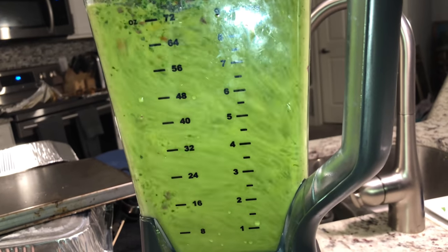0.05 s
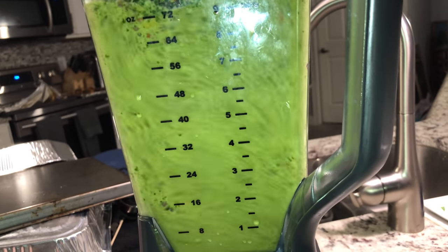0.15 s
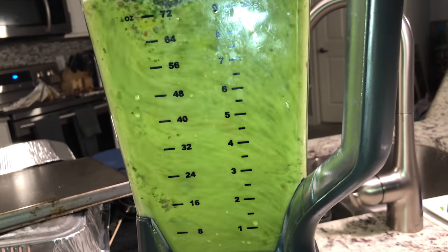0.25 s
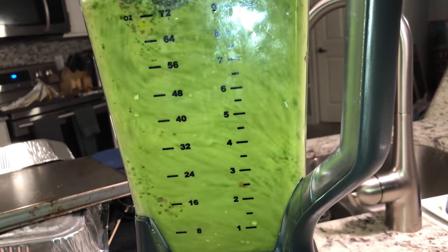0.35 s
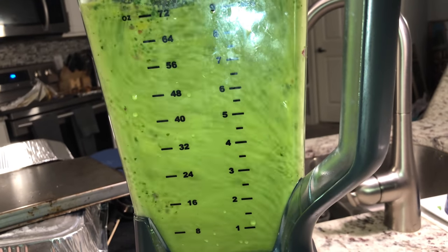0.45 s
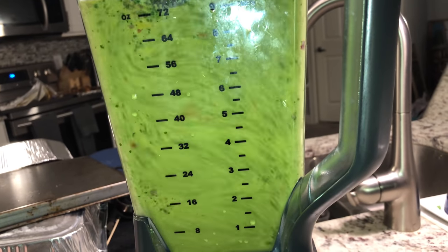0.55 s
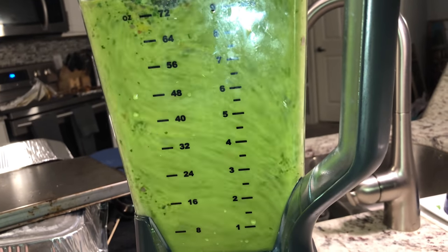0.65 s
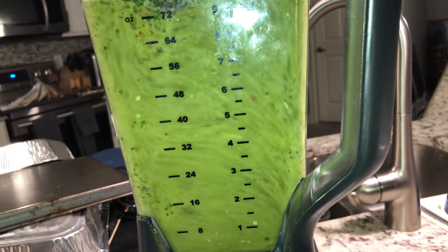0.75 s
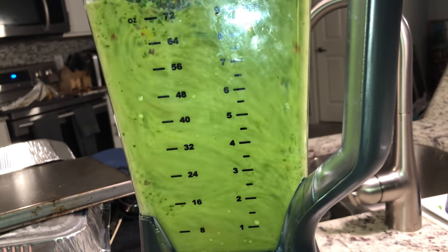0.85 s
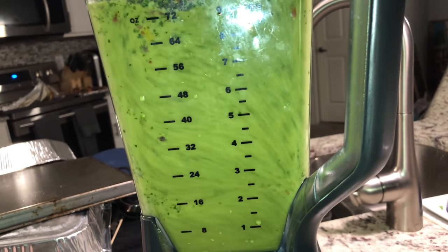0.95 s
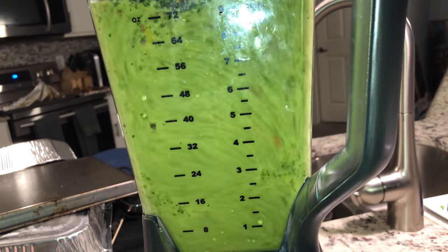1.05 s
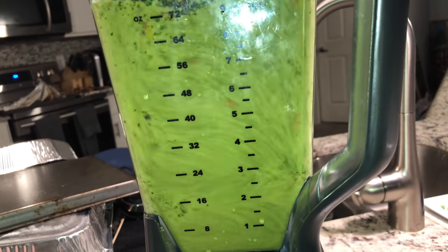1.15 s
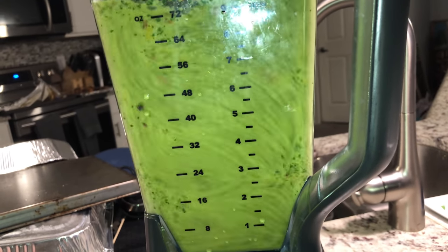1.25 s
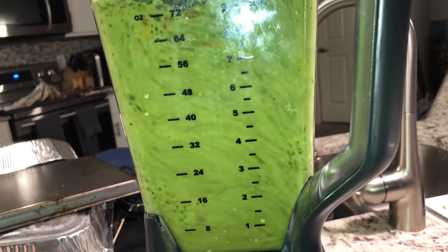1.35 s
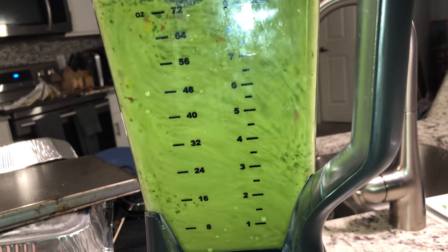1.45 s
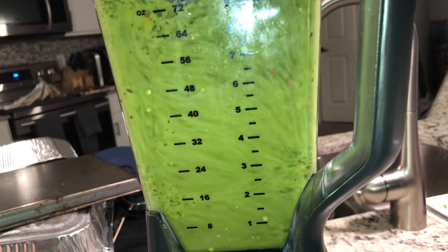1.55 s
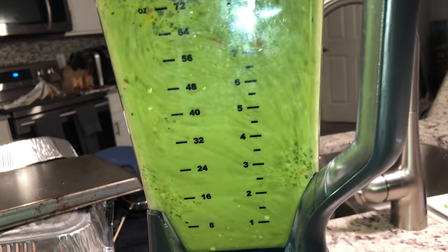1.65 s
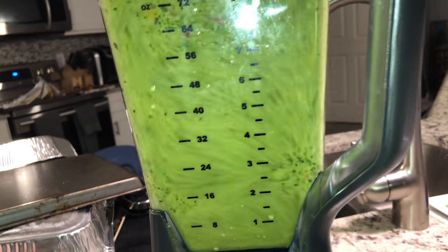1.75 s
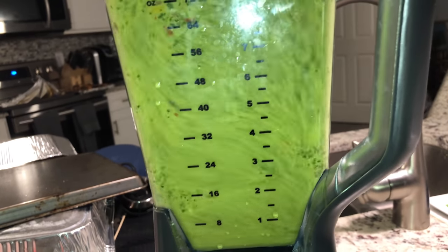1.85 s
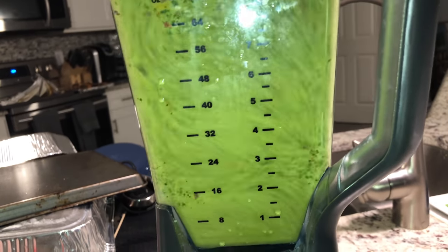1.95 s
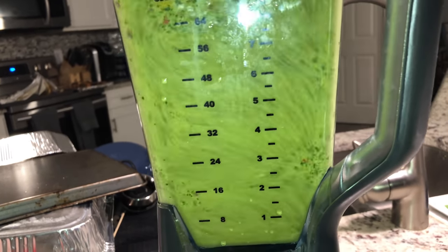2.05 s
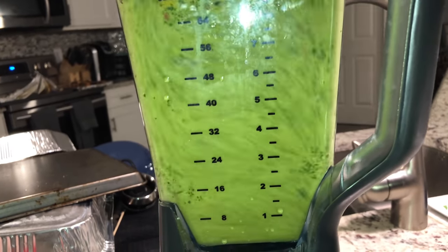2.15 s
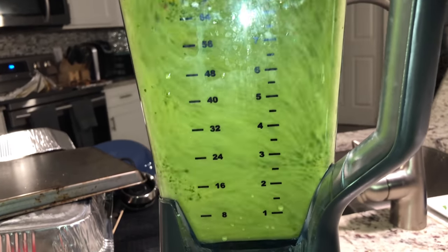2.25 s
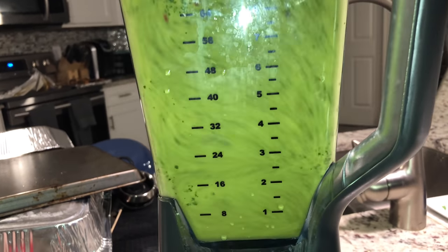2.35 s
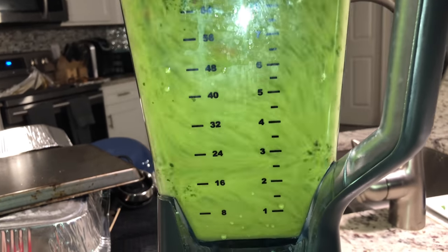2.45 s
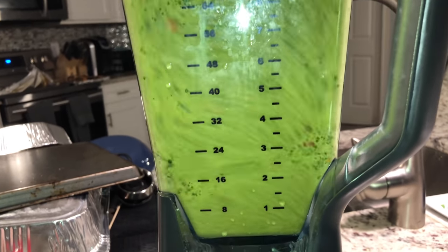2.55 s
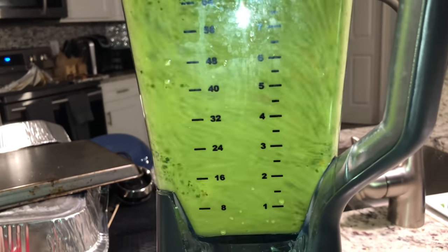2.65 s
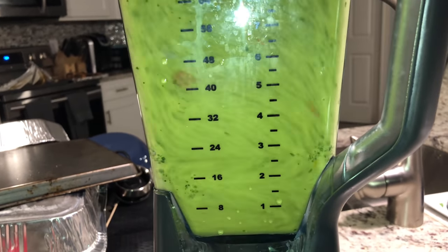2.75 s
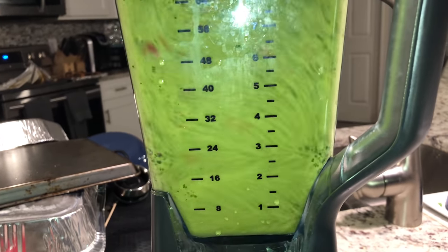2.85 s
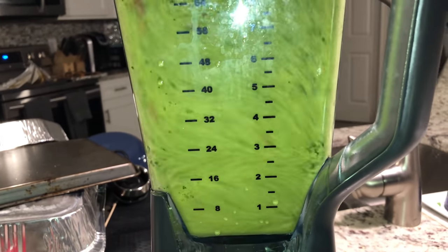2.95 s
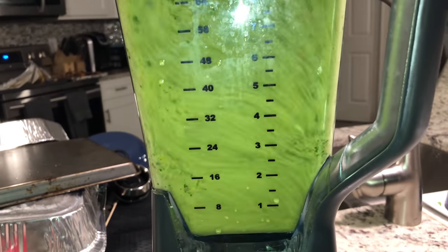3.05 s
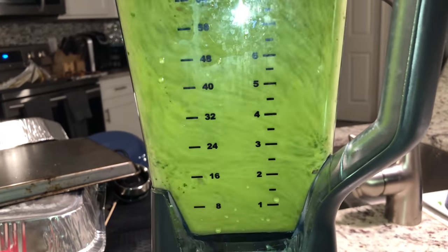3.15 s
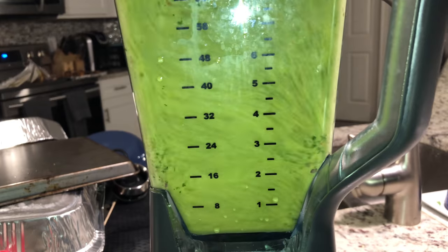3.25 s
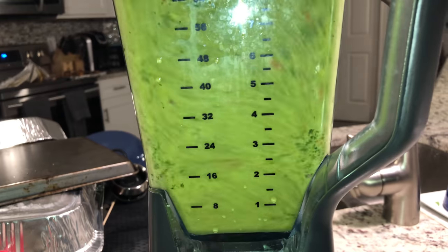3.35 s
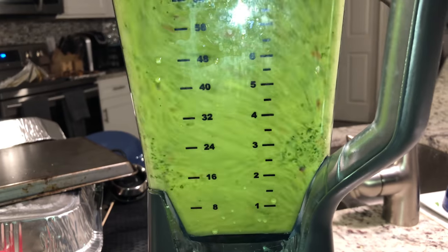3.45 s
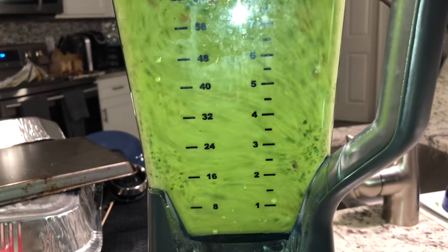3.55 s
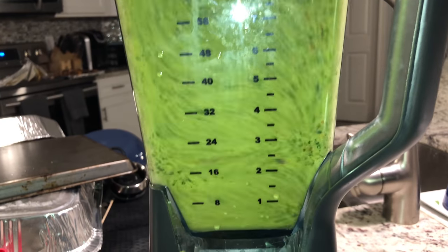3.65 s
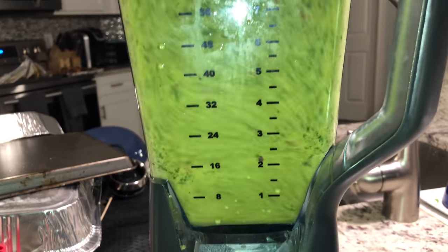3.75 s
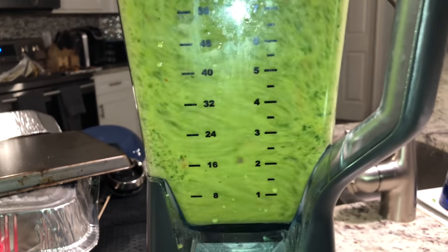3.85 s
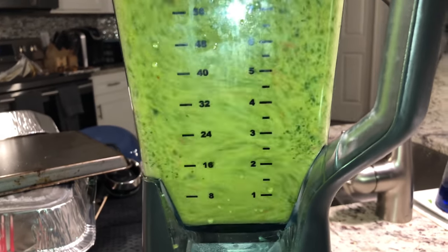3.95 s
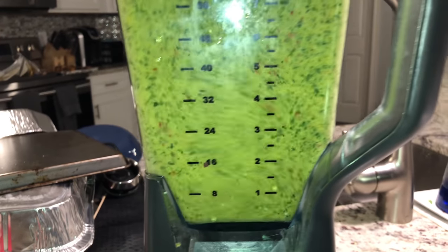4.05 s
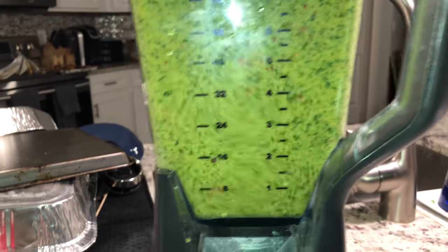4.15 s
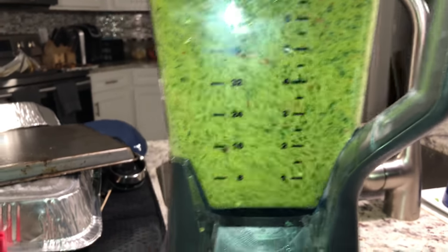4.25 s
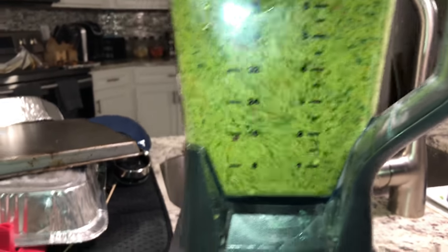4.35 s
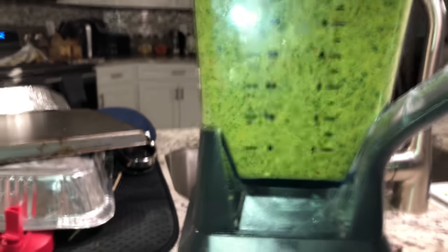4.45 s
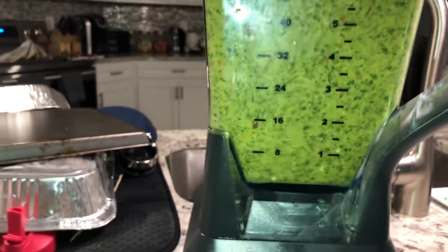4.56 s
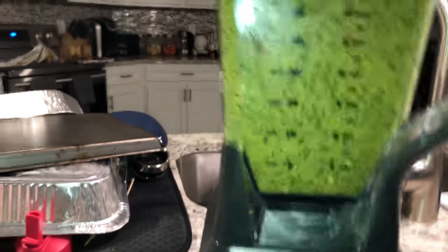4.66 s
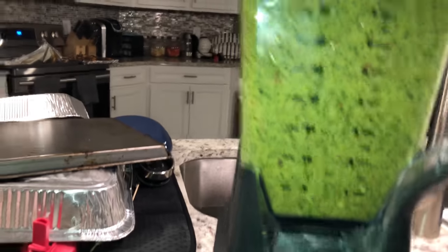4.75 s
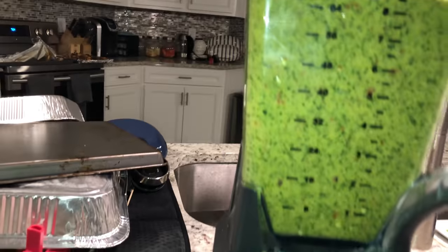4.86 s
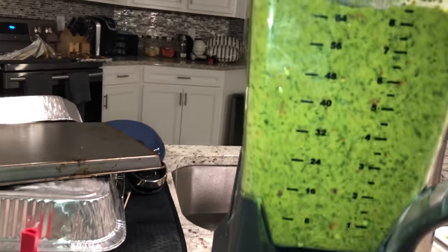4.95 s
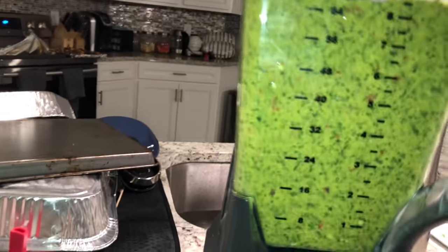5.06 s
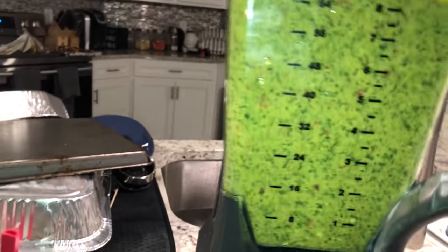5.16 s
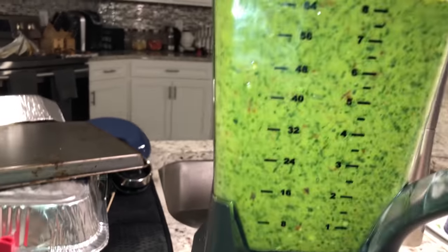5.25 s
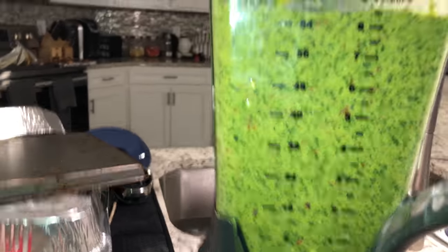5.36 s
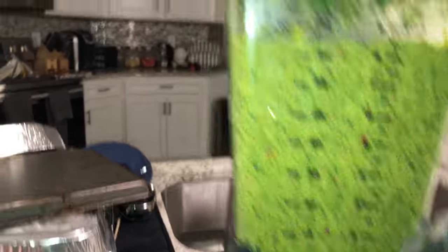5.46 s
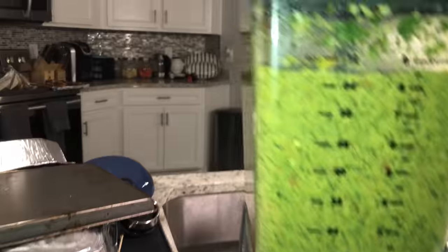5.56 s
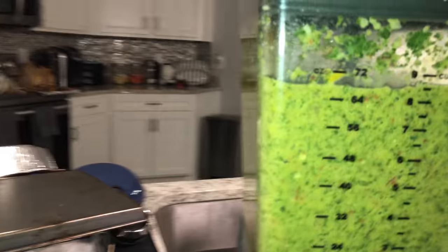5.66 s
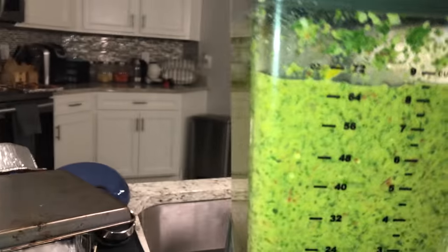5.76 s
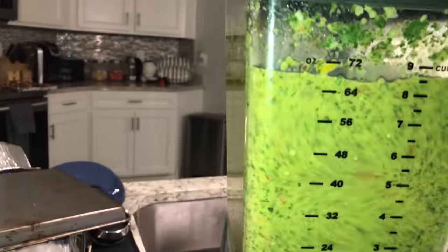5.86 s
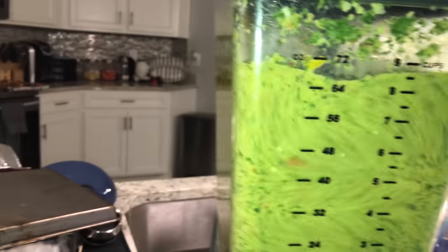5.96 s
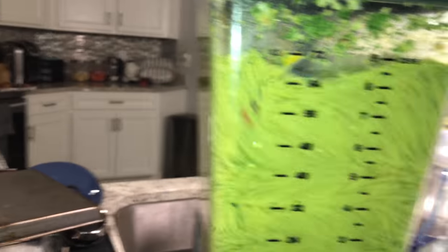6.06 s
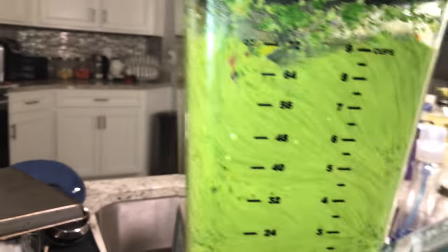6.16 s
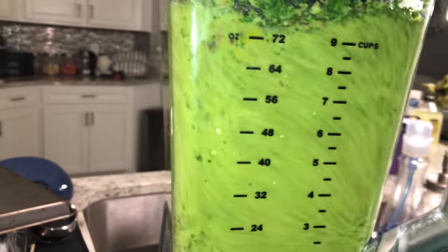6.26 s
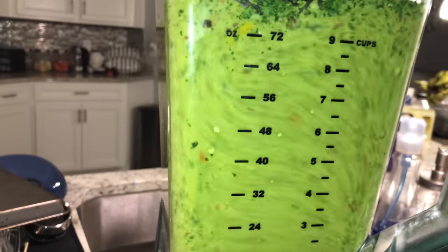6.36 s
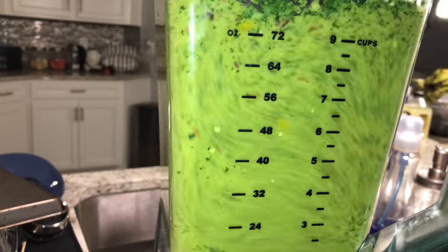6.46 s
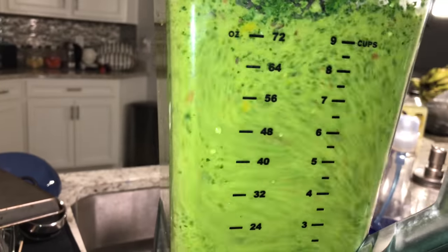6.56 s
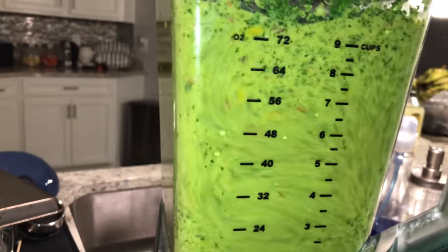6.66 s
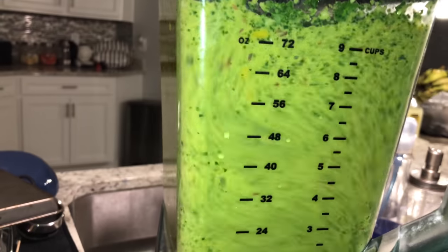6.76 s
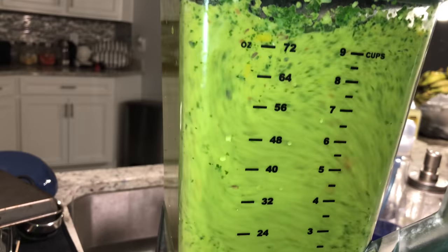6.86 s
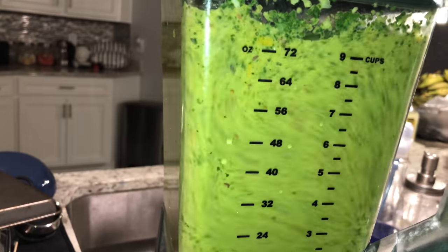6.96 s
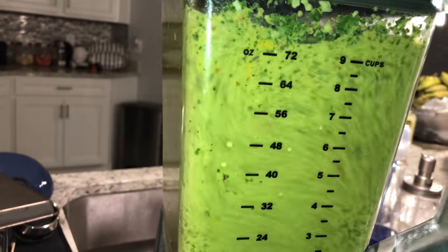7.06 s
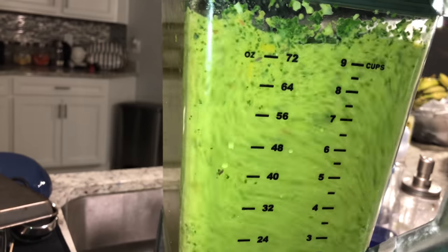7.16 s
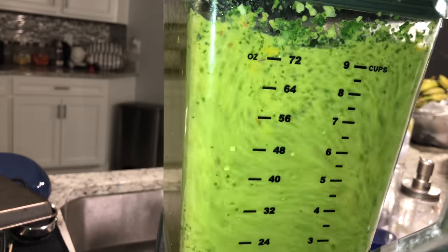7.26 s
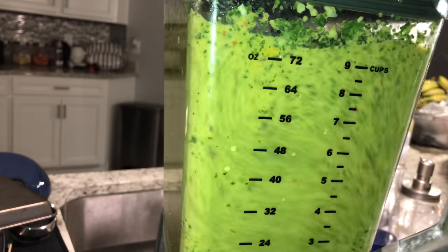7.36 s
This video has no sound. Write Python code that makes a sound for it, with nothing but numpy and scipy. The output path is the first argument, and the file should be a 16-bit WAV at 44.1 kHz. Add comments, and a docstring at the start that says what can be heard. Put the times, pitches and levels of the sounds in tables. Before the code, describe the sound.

Loud close blender churning herb paste, winding down with falling whine and slowing clacks, a brief near-silence, button clicks, then a sudden restart.

```python
"""A countertop blender purees a thick herb paste, close to a mono microphone in a kitchen.
One speed curve drives it all: brush motor flat out, switched off, coasting to rest, clicked on, spinning up.
Impact noise makes churning paste, rattling gears and crackle; fan noise is replayed at a rate set by speed.
Shaft-locked partials make hum, rumble and whines; knocks and clicks ring a panel.
Housing resonances and a short room tail shape the machine; faint kitchen noise lies beneath.
"""
import sys
import numpy as np
from scipy import signal
from scipy.fft import rfft, irfft, next_fast_len
from scipy.io import wavfile
from scipy.ndimage import map_coordinates

SR = 44100
rng = np.random.default_rng(int(sys.argv[2]) if len(sys.argv) > 2 else 0)


def pcm_store(signal):
    """Save signal as 16-bit PCM."""
    levels = np.round(np.clip(np.atleast_2d(signal), -1, 1) * 32767)
    wavfile.write(sys.argv[1], SR, levels.astype(np.int16).T)


N = 326781

REF_SPEED_RPS = 265  # pace = 1; rps = motor turns/s
GEAR_RATIO = 5  # motor turns per blade turn
SWITCH_OFF_S, STOP_S, RESTART_S = 3.32, 5.4285, 5.689
MAINS_HZ, TOP_HZ = 60, 15800


def amp(db):
    """Decibels to gain."""
    return 10 ** (np.asarray(db) / 20)


def unit(x):
    """Scale to rms 1."""
    return x / np.sqrt(np.mean(x ** 2) + 1e-20)


def along(points, hz):
    """Interpolate (f/Hz, value) points on a log axis."""
    f, v = np.transpose(points)
    return np.interp(np.log(hz + 1), np.log(f + 1), v)


def curves(rows):
    """One value per sample for each column after the time."""
    s, *cols = np.transpose(rows)
    return np.array([np.interp(np.arange(N) / SR, s, c) for c in cols])


def since(s):
    """Seconds gone by after time s, 0 before it."""
    return np.maximum(np.arange(N) / SR - s, 0)


def swell(s, half_s):
    """Gaussian bell of height 1 at time s, down to 1/e at half_s either side."""
    return np.exp(-((np.arange(N) / SR - s) / half_s) ** 2)


def wobble(rate):
    """Smooth random curve, rate knots a second."""
    knots = rng.standard_normal(int(N * rate / SR) + 4)
    return map_coordinates(knots, [np.arange(N) * rate / SR])


def shaped(x, gain_db):
    """Causal minimum-phase filter with the given dB function of frequency."""
    size = 2 * next_fast_len(N // 2 + SR // 4)
    cepstrum = irfft(np.log(amp(gain_db(np.fft.rfftfreq(size, 1 / SR)))))
    # fold the anticausal half onto the causal one
    cepstrum[1:size // 2] *= 2
    cepstrum[size // 2 + 1:] = 0
    return irfft(rfft(x, size) * np.exp(rfft(cepstrum)))[:N]


def coloured(x, spectrum):
    """x filtered by the given spectrum, at rms 1."""
    return unit(shaped(x, lambda hz: along(spectrum, hz)))


def resonate(x, modes):
    """Resonances lift bands, hollows cut them: dB bells summed over (f/Hz, width/Hz, level/dB)."""
    def gain_db(hz):
        return sum(db / (1 + (2 * (hz - f) / width) ** 2) for f, width, db in modes)
    return shaped(x, gain_db)


def impacts(rate, share):
    """Random impacts, rate a second, carrying a share of the power over a smooth rush."""
    chance = np.clip(rate / SR, 1 / SR, 1)
    share = np.clip(share, 0, 1)
    hits = (rng.random(N) < chance) * rng.standard_normal(N) / np.sqrt(chance)
    return np.sqrt(share) * hits + np.sqrt(1 - share) * rng.standard_normal(N)


def tone(turns, order, blur, waver_db=1.8):
    """One partial of a turning shaft, rms 1, unsteady in level and phase (blur/rad)."""
    waver = amp(waver_db * wobble(14))
    return unit(waver * np.sin(2 * np.pi * order * turns + blur * wobble(45)))


def room(x, wet_db, t60_s):
    """Add a short, dense decaying tail: the answer of a casing or of counter and cabinets."""
    t = np.arange(SR // 2) / SR
    tail = rng.standard_normal(len(t)) * amp(-60 * t / t60_s) * (t > .002)
    return x + amp(wet_db) * signal.fftconvolve(x, tail / np.linalg.norm(tail))[:N]


def second_run():
    """0 until the restart, then a 4.5 ms rise to 1."""
    return np.clip((np.arange(N) / SR - RESTART_S) / 0.0045, 0, 1)


START_RPS, SAG_RPS_PER_S = 267.2, 1.0
RAMP_RPS_PER_S, RAMP_S = 126, .6
# dry friction; speed at which drag equals it
FRICTION_RPS_PER_S, DRAG_RPS = 84.87, 161.3
# spin-up target; share of it won in the kick; time constants
TARGET_RPS, KICK_SHARE, KICK_S, CLIMB_S = 273.2, .556, .063, .32


def motor_speed():
    """Turns/s: slight sag, ramp down, coast against friction and square-law drag; then kick and slow climb."""
    t = np.arange(N) / SR
    powered = START_RPS - SAG_RPS_PER_S * t - RAMP_RPS_PER_S * np.minimum(since(SWITCH_OFF_S), RAMP_S)
    to_stop = np.clip(STOP_S - t, 0, STOP_S - SWITCH_OFF_S)
    coasting = DRAG_RPS * np.tan(FRICTION_RPS_PER_S / DRAG_RPS * to_stop)
    running = since(RESTART_S)
    lag = KICK_SHARE * np.exp(-running / KICK_S) + (1 - KICK_SHARE) * np.exp(-running / CLIMB_S)
    return np.minimum(powered, coasting) + TARGET_RPS * np.maximum(1 - lag, 0)


# wads of herbs drag through the blades: (t/s, half-width/s, level/dB before a layer's share)
WADS = [(1.95, 0.082, 2), (2.75, 0.7, 1.5), (3.25, 0.098, 0.5), (3.7, 0.093, 1), (4.23, .09, 1.5),
        (6.13, .11, 4), (6.4, 0.11, 1)]
# level dips briefly after switch-off: (t/s, half-width/s, level/dB before a layer's share)
SWITCH_OFF_DIP = [(3.43, 0.15, -2.5)]
# the paste settles as the blades stop
SETTLE_S, SETTLE_DB_PER_S = 5.255, 68


def drive(pace, full_db, lid_db, growth, strain_db, creep_db, wad_share, dip_share):
    """Layer gain: power of the speed, shuddering strain of spin-up, steady creep that settles at the stop."""
    on, running = second_run(), since(RESTART_S)
    spin = amp(full_db + lid_db * on) * pace ** growth
    strain = amp(strain_db) * on * np.clip(1 - pace, 0, 1)
    creep = amp(creep_db - SETTLE_DB_PER_S * since(SETTLE_S))
    # inrush torque pulses at twice mains
    shudder = 1 + 0.5 * np.exp(-running / 0.068) * np.sin(2 * np.pi * 2 * MAINS_HZ * running)
    wads_db = sum(db * swell(s, half_s) for s, half_s, db in WADS)
    dip_db = sum(db * swell(s, half_s) for s, half_s, db in SWITCH_OFF_DIP)
    power = spin ** 2 + strain ** 2 + creep ** 2
    return np.sqrt(power) * shudder * amp(wad_share * wads_db + dip_share * dip_db)


# churn spectrum: (f/Hz, relative level/dB per Hz)
PASTE_SPECTRUM = [(25, -66), (45, -23), (80, -19.5), (110, -15.5), (150, -4.5), (210, 0.5), (280, -2.5),
                  (400, -4), (550, -7.5), (900, -19.5), (2500, -51.5)]


def paste(pace):
    """Blades slap the paste and air pockets collapse in it: dull, irregular thuds."""
    thuds = impacts(250 + 300 * pace, share=0.28) * amp(0.62 * wobble(22))
    return amp(-1.8) * coloured(thuds, PASTE_SPECTRUM)


def unbalance(speed, turns, mount_hz=150, width_hz=45):
    """The motor's first two orders boom as they cross the resonance of the base on its feet."""
    boom = sum(tone(turns, order=k, blur=0.56) / np.hypot(1, 2 * (k * speed - mount_hz) / width_hz)
               for k in (1, 2))
    return amp(-8) * boom * np.clip(speed / 60, 0, 1) ** 2


# blade-shaft unbalance: (multiple of blade speed, relative level/dB)
BLADE_ORDERS = [(1, -50.5), (2, -50), (3, -39.5), (4, -36), (5, -40.5), (8, -44), (9, -46.5)]


def hum(pace, blade_turns):
    """The loaded blade shaft shakes the base at its lowest orders, heard less from above."""
    orders = sum(amp(db) * tone(blade_turns, order=round(k), blur=0.2) for k, db in BLADE_ORDERS)
    return amp(27.0) * orders * pace ** 4 * amp(-4 * second_run())


# rattle spectrum: (f/Hz, relative level/dB per Hz)
GEAR_SPECTRUM = [(40, -52), (150, -30.5), (400, -4.5), (650, -0.5), (1100, -1), (1700, -2.5), (2400, -9.5),
                 (3300, -12.5), (6000, -23.5), (15000, -63)]


def gears(pace, blade_turns, load):
    """Teeth and coupling rattle, denser with speed and harder as each blade bites."""
    bite = 1 + 0.15 * np.sin(2 * np.pi * 2 * blade_turns)
    rattle = impacts(500 + 1000 * pace, share=0.32) * bite * load
    return amp(-.5 + 2.4 * pace) * coloured(rattle, GEAR_SPECTRUM)


# air-noise spectrum at pace 1: (f/Hz, relative level/dB per Hz)
FAN_SPECTRUM = [(40, -63), (600, -24), (1500, -17), (2100, -2.5), (2600, 0), (2950, -0.5), (3300, -2),
                (4200, -15.5), (9000, -43)]


def fan(pace, load):
    """Air torn by the cooling fan: noise replayed at the pace, so pitch and strength go with speed."""
    air = coloured(impacts(1100, share=0.27), FAN_SPECTRUM)
    return amp(1.0) * pace * load * map_coordinates(air, [np.cumsum(pace)], mode="wrap")


# motor-frame resonances and hollows: (f/Hz, width/Hz, level/dB); also shapes hiss
FRAME_MODES = [(344, 75, 4.5), (476, 71, -10.5), (860, 80, -7), (1625, 110, 0), (1980, 71, -4),
               (3020, 500, -3), (4160, 650, 8), (5640, 230, -0.5), (6900, 270, 4), (7500, 670, -11),
               (8700, 400, 2), (10600, 460, 1), (12500, 1700, -8)]
# rumble through bearings and frame: (f/Hz, relative level/dB per Hz)
ROTOR_SPECTRUM = [(60, -13), (100, -11), (145, 3.5), (220, -1.5), (340, 6), (600, -8.5), (1000, 0.5),
                  (1700, 4), (2300, -7.5), (3100, -25), (4400, -8), (5600, -11), (9000, -30)]


def rotor(pace, turns, count=80, size=2048):
    """The same rough track passes once a turn: a dense comb of partials, bare at low speed."""
    track = unit(irfft(np.r_[0, np.exp(2j * np.pi * rng.random(count))], size))
    rolling = map_coordinates(track, [turns % 1 * size], order=1, mode="grid-wrap")
    lumps = amp(2.7 * wobble(24))  # chunks drag on the blades
    rumble = resonate(coloured(rolling * np.sqrt(pace + 0.064), ROTOR_SPECTRUM), FRAME_MODES)
    return amp(7.5 - 18.6 * pace) * np.sqrt(pace) * lumps * rumble


# crackle spectrum: (f/Hz, relative level/dB per Hz)
HISS_SPECTRUM = [(60, -62), (1000, -21.5), (2500, -2), (4000, 0.5), (5300, -1), (7000, -3), (9000, -6),
                 (11000, -9.5), (13000, -12), (15800, -16)]


def hiss(pace, load):
    """Chopped bits pelt the jar in a fine crackle; at low speed only the scrape in the motor's frame is left."""
    crackle = coloured(impacts(1200 + 2200 * pace, share=0.21) * load, HISS_SPECTRUM)
    slow = np.clip(1.5 - 1.3 * pace, 0, 1)
    return amp(-1.0 + 1.8 * pace) * (crackle * (1 - slow) + resonate(crackle, FRAME_MODES) * slow)


# gear and commutator partials: (multiple of motor speed, relative level/dB)
BRUSH_ORDERS = [(19, -14), (29, -12), (36, -16), (38, -16), (48, -10.5), (60, -16), (72, -17), (84, -18),
                (96, -14), (108, -21), (120, -16), (144, -20)]
# frame's radiation of the whine: (f/Hz, level/dB)
WHINE_REACH = [(800, -6), (2000, -1), (3400, -3), (4400, 3), (6000, 3), (7000, -7), (8200, 1), (9600, -6),
               (11200, 1), (12500, -9), (15000, -9)]


def brush_whine(speed, turns):
    """Gear and commutator partials glide with the shaft and flare as they cross the frame's short resonances."""
    whine = sum(amp(db) * (k * speed < TOP_HZ) * tone(turns, order=round(k), blur=1.3)
                for k, db in BRUSH_ORDERS)
    radiated = shaped(whine, lambda hz: along(WHINE_REACH, hz))
    radiated = room(radiated, wet_db=1, t60_s=.02)
    return radiated * amp(2 - 20 * (speed / REF_SPEED_RPS) ** 2.5) * np.clip(speed / 40, 0, 1)


def brush_squeak(pace):
    """The brush holders sing in one thin, high band, standing out most from the hiss while the rotor is slow."""
    spectrum = [(12500, -60), (14000, -12), (14400, 1), (14900, -11), (15800, -18)]  # f/Hz, level/dB
    band = coloured(rng.standard_normal(N), spectrum)
    return amp(-5 - 14 * pace) * np.sqrt(pace) * band


# fan tone's reach to the microphone: (t/s, relative level/dB)
FAN_REACH = [(1.2, -46.5), (2.5, -41.5), (5.6, -42), (6.1, -29.5)]
VENT_HZ, VENT_WIDTH_HZ = 3520, 380


def fan_whine(speed, turns):
    """Thirteen fan blades pass the vent each turn; the tone sings out as it nears the vent's resonance."""
    passing, pitch_hz = 13 * turns, 13 * speed
    vent = 1 / np.hypot(1, 2 * (pitch_hz - VENT_HZ) / VENT_WIDTH_HZ)
    gain = amp(curves(FAN_REACH)[0]) * (speed / REF_SPEED_RPS) ** 3 * vent
    overtone = amp(-15) * tone(passing, order=2, blur=1)
    return gain * (tone(passing, order=1, blur=0.15, waver_db=.6) + overtone)


# housing and jar, heard beside the base: (f/Hz, width/Hz, level/dB)
BESIDE_MODES = [(165, 41, 1.5), (471, 66, 6.5), (553, 150, -3), (888, 160, 4.5), (1493, 260, -4),
                (1610, 120, 3), (2153, 190, 3.5), (2640, 480, 5), (4010, 1540, -3.5), (4820, 300, 4),
                (5470, 110, 5.5), (6310, 180, 4), (7440, 320, -2.5), (7770, 420, 5), (14100, 320, -7)]
# housing and jar, heard near the lid: (f/Hz, width/Hz, level/dB)
ABOVE_MODES = [(50, 40, -3.5), (130, 50, -0.5), (220, 90, 1), (298, 160, 2.5), (493, 73, 3.5),
               (570, 73, -2.5), (863, 91, 2), (2130, 280, 4), (2800, 180, 6.5), (3150, 190, -3.5),
               (4150, 370, -4), (5720, 350, 6.5), (6800, 210, 1.5), (7670, 160, 6.5)]


def housing(machine):
    """Housing and jar lift and hollow out bands, heard from beside, then from above in the second run."""
    on = second_run()
    beside = resonate(machine * (1 - on), BESIDE_MODES)
    return amp(-0.94) * (beside + resonate(machine * on, ABOVE_MODES))


# background spectrum: (f/Hz, relative level/dB per Hz)
KITCHEN_SPECTRUM = [(25, -32), (70, -9), (200, 1), (600, -7), (1500, -6), (4000, -23), (15000, -29)]


def kitchen():
    """Faint steady background noise."""
    return amp(-58.5) * coloured(rng.standard_normal(N), KITCHEN_SPECTRUM)


# wide swell of commutator noise, then a brief whisper: (t/s, half-width/s, peak level/dB before housing)
COAST_SWELLS = [(4.55, 0.34, -54), (5.23, .07, -61.5)]
# their spectrum: (f/Hz, relative level/dB per Hz)
COAST_SPECTRUM = [(3000, -30), (6500, -12), (7900, -3), (9200, -3), (11000, -4), (12500, -18), (14500, -10),
                  (15800, -18)]


def coast_noise():
    """A wide swell of high commutator whine noise in the coast, then a brief airy whisper before the stop."""
    gain = sum(amp(db) * swell(s, half_s) for s, half_s, db in COAST_SWELLS)
    return gain * coloured(impacts(3000, share=.4), COAST_SPECTRUM)


# span of the evenly spaced knocks, in blade turns before standstill; the final three are in CLICKS
KNOCK_FROM, KNOCK_TO = 14.8, 2.8
# peak at pace 1, power of the pace, scatter, scuff level, contact time
KNOCK_DB, KNOCK_GROWTH, KNOCK_SCATTER_DB, KNOCK_SCUFF_DB, KNOCK_CONTACT_S = -13, 1.5, 1, -3, .002


def coupling_knocks(pace, blade_turns):
    """Slack coupling knocks once a blade turn in the coast, ever slower, softer but for scatter: CLICKS rows."""
    before_stop = np.arange(KNOCK_FROM, KNOCK_TO - .5, -1)
    at = np.searchsorted(blade_turns, blade_turns[round(STOP_S * SR)] - before_stop)
    scatter_db = KNOCK_SCATTER_DB * rng.standard_normal(len(at))
    peaks_db = KNOCK_DB + KNOCK_GROWTH * 20 * np.log10(pace[at]) + scatter_db
    return [(i / SR, db, KNOCK_SCUFF_DB, KNOCK_CONTACT_S) for i, db in zip(at, peaks_db)]


# last three coupling knocks as the blades halt, button down and up, restart:
# (t/s, dry peak level/dB, scuff level/dB re ring, contact time/s)
CLICKS = [(4.9685, -32.5, 1, .003), (5.1102, -33, 6, 0.0015), (5.3452, -37, -9, 0.002),
          (5.5876, -19.5, -2, 0.0013), (5.632, -35, 4, 0.003), (5.689, -26, -4, .001)]
# plastic panel's ring: (f/Hz, relative level/dB, t60/s)
PANEL = [(464, -4.5, 0.025), (812, -8.5, 0.057), (1150, 3, 0.019), (1710, 1.5, 0.021), (2275, 1.5, 0.02),
         (3390, -1.5, 0.02), (3820, -4, 0.017), (4660, 0, 0.016), (5840, -9, .018), (6350, -14, .014)]
# contact scuff spectrum: (f/Hz, relative level/dB per Hz)
SCUFF_SPECTRUM = [(200, -19), (1000, 4), (7000, -6), (9000, -13), (15800, -15)]


def contacts(knocks):
    """Each knock and click is a brief scuff with a blow that rings the plastic panel."""
    t = np.arange(SR // 4) / SR
    grit = coloured(rng.standard_normal(N), SCUFF_SPECTRUM)
    out = np.zeros(N)
    for s, db, scuff_db, contact_s in knocks + CLICKS:
        start = round(s * SR)
        ring = sum(amp(level_db - 60 * t / t60_s) * np.sin(2 * np.pi * (hz * t + rng.random()))
                   for hz, level_db, t60_s in PANEL)
        ring *= 1 - np.exp(-t / contact_s)
        scuff = grit[start:][:len(t)] * t / contact_s * np.exp(-t / contact_s)
        click = ring / abs(ring).max() + amp(scuff_db) * scuff / abs(scuff).max()
        out[start:][:len(t)] += amp(db) * click / abs(click).max()
    return out


SQUEAL_S, SQUEAL_HALF_S, SQUEAL_HZ, SQUEAL_FALL_HZ_PER_S = 5.235, .04, 5200, 10000


def bearing_squeal():
    """A bearing's faint, falling squeal in the rotor's last turns."""
    pitch_hz = SQUEAL_HZ - SQUEAL_FALL_HZ_PER_S * (np.arange(N) / SR - SQUEAL_S)
    gain = amp(-64) * swell(SQUEAL_S, SQUEAL_HALF_S)
    return gain * tone(np.cumsum(pitch_hz) / SR, order=1, blur=2.5)


def scene():
    """One motor speed plays every part of the machine; the microphone rises to the lid for the second run."""
    speed = motor_speed()
    pace, turns = speed / REF_SPEED_RPS, np.cumsum(speed) / SR
    blade_turns = turns / GEAR_RATIO
    paste_gain = drive(pace, full_db=-27.5, lid_db=0.05, growth=1.27, strain_db=-23.5, creep_db=-51.5,
                       wad_share=1.0, dip_share=0.59)
    gear_gain = drive(pace, full_db=-29.0, lid_db=1.65, growth=1.144, strain_db=-29, creep_db=-53.5,
                      wad_share=0.47, dip_share=.55)
    hiss_gain = drive(pace, full_db=-27, lid_db=-0.7, growth=2.21, strain_db=-37.5, creep_db=-58.5,
                      wad_share=0.063, dip_share=1.54)
    # lumps load the blades unevenly
    load = amp(0.54 * wobble(7) + 0.2 * wobble(30) + 0.31 * wobble(130))
    machine = paste_gain * (paste(pace) + unbalance(speed, turns) + hum(pace, blade_turns))
    machine += gear_gain * (gears(pace, blade_turns, load) + fan(pace, load) + rotor(pace, turns))
    machine += hiss_gain * (hiss(pace, load) + brush_whine(speed, turns) + brush_squeak(pace))
    machine += fan_whine(speed, turns)
    machine += coast_noise() + bearing_squeal()
    near = housing(machine) + contacts(coupling_knocks(pace, blade_turns))
    sound = room(near, wet_db=-12.5, t60_s=0.22) + kitchen()
    return np.array([sound, sound])


def record(dry):
    """Nothing is kept at or above the band limit."""
    size = next_fast_len(N + SR // 2)
    return irfft(rfft(dry, size) * (np.fft.rfftfreq(size, 1 / SR) < TOP_HZ), size)[:, :N]


dry = scene()
out = record(dry)
pcm_store(out)
```